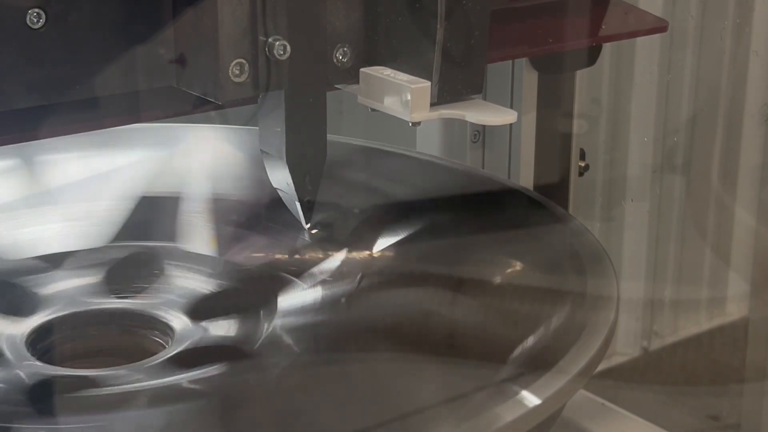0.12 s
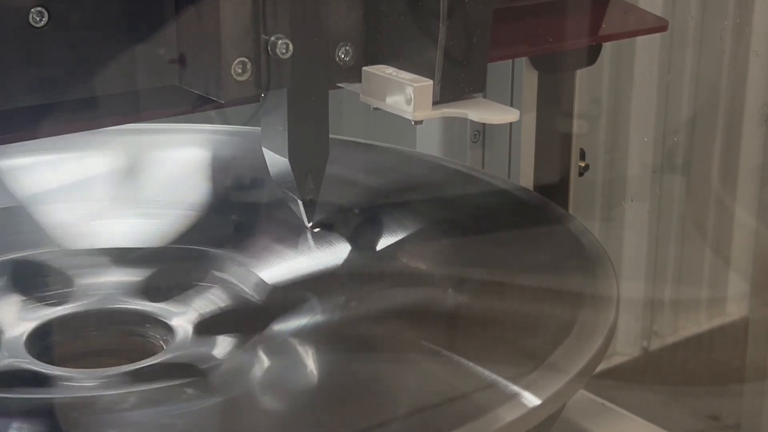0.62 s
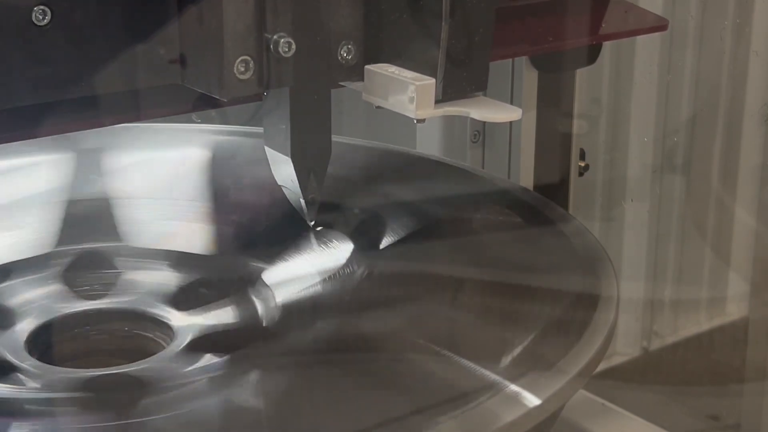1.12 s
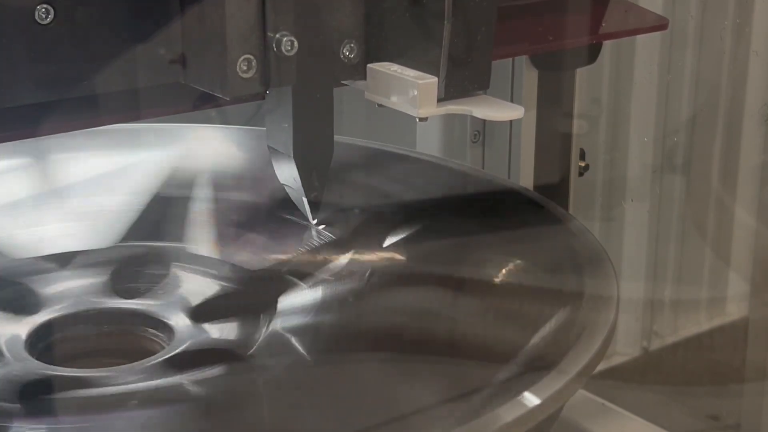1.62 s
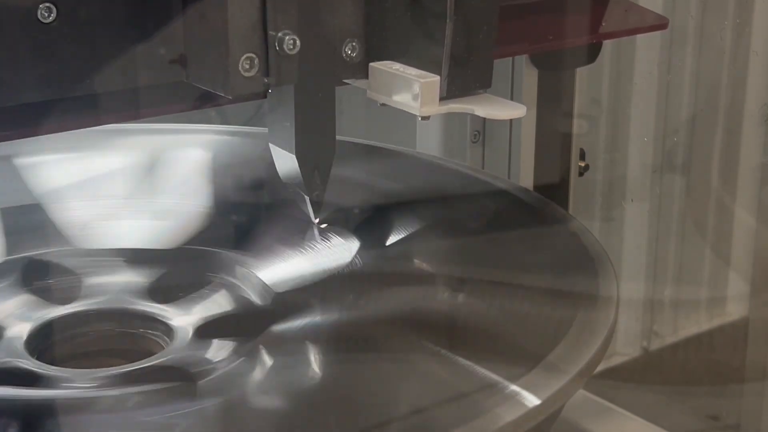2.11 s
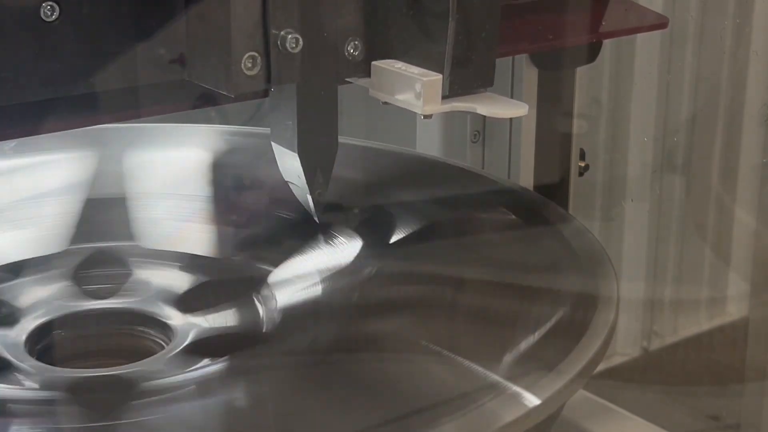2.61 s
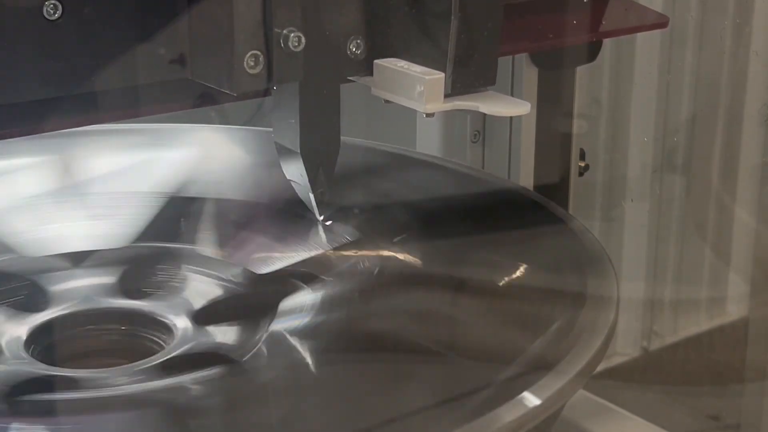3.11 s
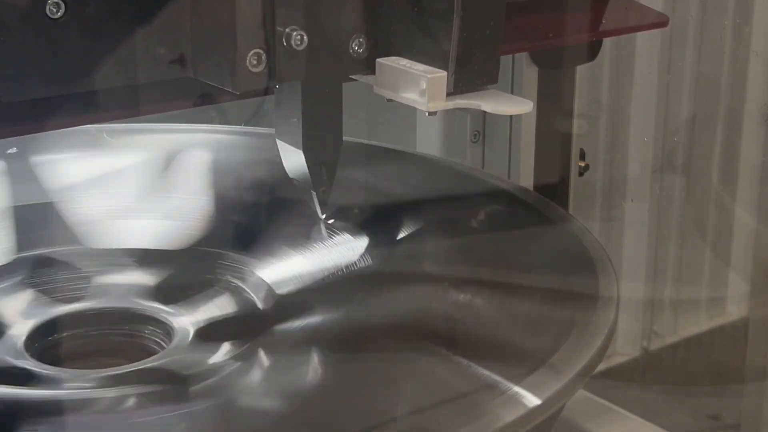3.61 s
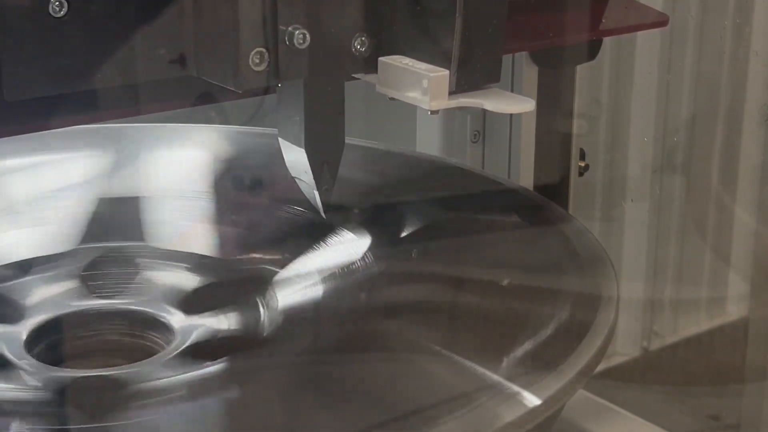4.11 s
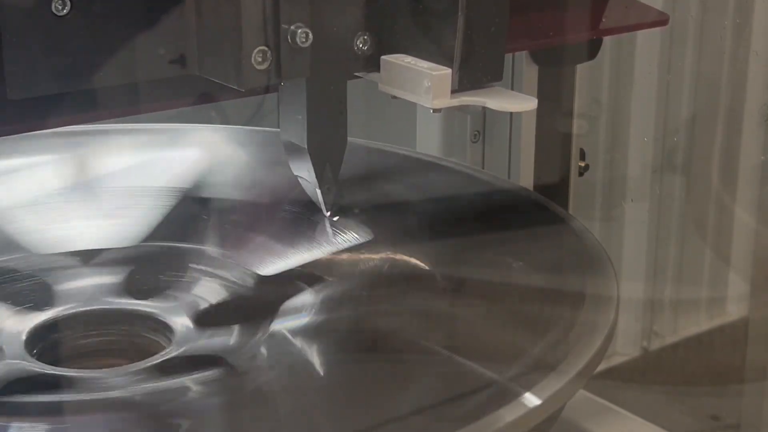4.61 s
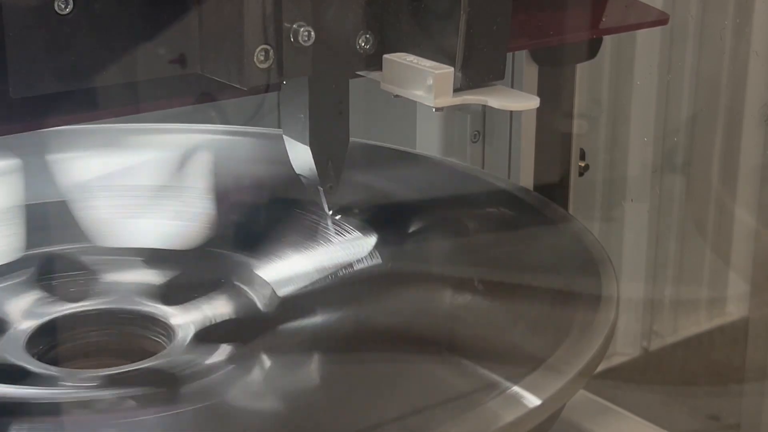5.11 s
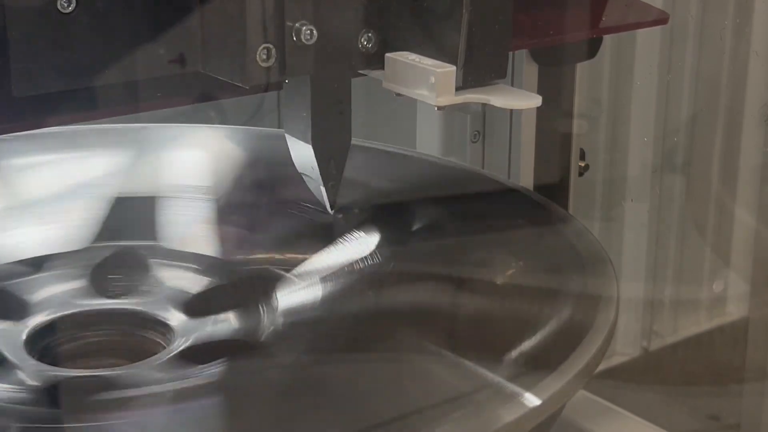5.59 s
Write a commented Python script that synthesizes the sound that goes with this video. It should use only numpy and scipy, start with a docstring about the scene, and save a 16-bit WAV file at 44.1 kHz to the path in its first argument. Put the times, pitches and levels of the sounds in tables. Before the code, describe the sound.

Steady machine noise throughout: deep motor drone, dozens of blurred low thumps each second, a buzzing metallic drivetrain and a thin piercing electric whine. A soft cutting hiss begins dull and becomes steadily brighter, while gear tones beat slowly and strengthen late on. Recorded near the lathe by two closely spaced microphones, dry, with little obvious room echo.

```python
"""A wheel lathe skims a metal face in a workshop, heard from close by through a pair of microphone ports.
From the start the drive train repeats a pattern about ten times a second: six low thumps a turn and a
dense comb of shaft orders that ring the frame. Under it lie the random hiss of cut and fans and the thin
switching whine of the motor drive, summed from sines. As the cut deepens most ranges grow, the treble
most, while a second, barely faster shaft beats slowly against the first, sixfold orders swelling to the end."""
import sys
import numpy as np
from scipy import signal
from scipy.fft import irfft
from scipy.io import wavfile
from scipy.ndimage import uniform_filter1d

SR = 44100
rng = np.random.default_rng(int(sys.argv[2]) if len(sys.argv) > 2 else 0)


def master_out(mix):
    """Clip the mix to full scale and print it as 16-bit PCM to the path in sys.argv[1]."""
    frames = np.transpose(np.atleast_2d(mix))
    ceiling = np.clip(frames, -1, 1)
    pcm = np.round(ceiling * 32767).astype(np.int16)
    wavfile.write(sys.argv[1], SR, pcm)


def boost_factor(decibels):
    """Convert a level in decibels to a linear amplitude factor."""
    exponent = np.asarray(decibels, float) / 20
    return 10 ** exponent


N = 252252

TURN = 4321  # samples a turn of the drive shaft
FIRST_THUMP_S = 0.014


def drive_train():
    """Fourier synthesis of a periodic source: one spectrum of orders a turn, cross-faded end to end."""
    turns, order = N // TURN + 2, np.arange(TURN // 2 + 1)
    hz, t = order * SR / TURN, np.arange(turns) * TURN / SR
    spectrum = shaft_orders(order, hz, t)
    set_thumps(spectrum, hz, t)
    cycle = irfft(spectrum, TURN) * TURN / np.sqrt(2)  # rms of each order to waveform
    fade = np.sin(np.pi / 2 * np.arange(TURN) / TURN) ** 2
    joined = cycle[:, :-1] * (1 - fade) + cycle[:, 1:] * fade
    return joined.reshape(2, -1)[:, :N]


# Strong low orders that make the thumps:
# order, left minus right/dB, level at mean load/dB rms, gain per load/(dB per dB)
THUMP_ORDERS = [(6, 0, -28.5, 0), (12, 3.5, -33.5, 1.5), (18, 3, -36, 0.77), (30, 0.5, -38, 2)]


def set_thumps(spectrum, hz, t):
    """Phase alignment of harmonics: low orders in step add up to one pulse, six times a turn."""
    for order, pan_db, level_db, follows in THUMP_ORDERS:
        order = round(order)
        thump = -np.exp(-2j * np.pi * hz[order] * FIRST_THUMP_S)  # all in step: a downward thump
        level = boost_factor(level_db + follows * load(t))
        spectrum[:, :, order] = ports(hz[order], pan_db)[:, None] * level * thump


# Strongest higher orders of both shafts, before drift and load:
# order, level of first shaft/dB rms, level of second shaft/dB rms, t in step/s
STRONG_ORDERS = [(57, -61, -66, 3), (60, -63, -60, 4.9), (66, -57, -70, .5), (69, -64, -58, 5.8),
                 (72, -55, -55.5, 5.7), (96, -65, -65, 1.9), (114, -60, -62, 5.75), (117, -57, -65, 5.6),
                 (147, -66, -68, 5.5), (174, -61, -60, 4.3), (179, -67, -60, 5.8), (182, -64, -56, 5.5),
                 (183, -67, -57, 5.3), (184, -62, -62, 3.8), (186, -77, -56, 4.2), (188, -68, -63, 5.4),
                 (189, -58, -56, 5.7), (190, -66, -66, 5.9), (192, -80, -60, 3.8), (198, -76, -66, 4),
                 (204, -64, -69, 5), (216, -67, -73, 5.5), (228, -66, -74, 5.4), (234, -59, -65, 6.1),
                 (294, -69, -71, 5), (300, -71, -66, 6.45), (306, -62, -65, 6.3), (309, -69, -70, 4),
                 (318, -68, -72, 5.5), (336, -70, -67, 6.45), (349, -67, -75, 6.2), (379, -64, -75, 6.3),
                 (467, -69, -74, 5), (600, -70, -72, 5.8), (612, -62, -64, 5.8), (618, -64, -64, 5.8)]
# Weight of the part that repeats every turn, before the common gain: f/Hz, level/dB
REPEATING = [(300, -7), (700, -4.5), (1900, -2), (4000, 1), (5500, -7), (9400, -9), (10500, -16),
             (16000, -24)]


def shaft_orders(order, hz, t):
    """Beating of two shafts of nearly equal speed: each order swells when the two are in step."""
    slip_hz_per_order = 0.00184  # lead of the second shaft; order x slip is the beat rate
    count = len(order)
    shape, moved = machine(hz, t, modes_db=-0.24)  # the shaft shakes the frame directly
    size = shape * boost_factor(read(REPEATING, hz) + 8.0)
    size *= boost_factor(2.8 * (order % 3 == 0) + 5.7 * (order % 6 == 0) - 4.0)  # three- and sixfold symmetry
    size *= boost_factor(-4.5 * rng.exponential(1, count) + 3.0)  # uneven teeth: many weak orders

    # weak orders are shared between the shafts by chance
    split, in_step = np.pi / 2 * rng.random(count), 20 * rng.random(count)
    in_step[::6] = 5.8  # s: sixfold orders swell together
    strong, first_db, second_db, strong_s = np.transpose(STRONG_ORDERS)
    strong, first, second = strong.astype(int), boost_factor(first_db), boost_factor(second_db)
    size[strong] = np.hypot(first, second)
    split[strong] = np.arctan2(second, first)
    in_step[strong] = strong_s
    ahead = 2 * np.pi * slip_hz_per_order * order * (t[:, None] - in_step)
    beat = np.cos(split) + np.sin(split) * np.exp(1j * ahead)

    lasting = np.exp(2j * np.pi * rng.random((count, 2)))
    knock = np.exp(-2j * np.pi * hz * FIRST_THUMP_S + 0.9j * rng.standard_normal(count))
    lasting[::6, 0] = knock[::6]  # sixfold orders gather loosely at each thump
    drift = chance(len(t), count, 2)
    drift = uniform_filter1d(drift, size=25, axis=0, mode="wrap") * 5  # back to unit power
    drift[:, strong] *= 0.6  # strong orders hold steadier
    near, other = np.moveaxis(1.015 * lasting * beat[:, :, None] + 0.58 * drift, 2, 0)
    return pair(near, other, hz) * size * moved


def hiss():
    """Filtered noise: random short-time spectra shaped by the same frame, with faint drifting patches."""
    frames, hz = N // 1024 + 5, np.fft.rfftfreq(4096, 1 / SR)
    shape, moved = machine(hz, np.arange(frames) * 1024 / SR, modes_db=-0.64)
    near, other, patches = np.moveaxis(chance(frames, len(hz), 3), 2, 0)
    patches = uniform_filter1d(patches.real, size=4, axis=0)
    patches = uniform_filter1d(patches, size=32, axis=1) * 16  # back to unit power
    spectrum = pair(near, other, hz) * shape * moved * boost_factor(1.27 * patches)
    sound = signal.istft(np.swapaxes(spectrum, 1, 2), nperseg=4096, noverlap=3072)[1][:, :N]
    return sound * np.sqrt(SR / 2048)  # dB per Hz to bin amplitude


# Motor drive whine, before waver and load:
# multiple of the carrier, multiple of the sideband spacing, level/dB rms
WHINE = [(1, -4, -70), (1, -2, -75), (1, -1, -56), (1, 0, -52), (1, 1, -53), (1, 2, -57), (1, 3, -62),
         (2, 0, -50)]
# Other steady tones, before waver and load: f/Hz, level/dB rms
TONES = [(42.1, -47), (46.1, -44), (464.0, -53.5), (927.9, -60)]


def tones():
    """Modulation sidebands of drive switching, and slower motors: sines that waver and follow the load."""
    carrier_hz, sideband_hz = 7854.9, 290.0
    lines = [(round(m) * carrier_hz + round(k) * sideband_hz, db) for m, k, db in WHINE]
    lines += [(hz, db) for hz, db in TONES]
    t, out = np.arange(N) / SR, np.zeros((2, N))
    load_db = load(t)
    for hz, db in lines:
        waver = np.interp(t, np.linspace(0, t[-1], num=40), rng.standard_normal(40))
        level = boost_factor(db + 1.1 * waver + 0.23 * load_db)
        spin = np.exp(2j * np.pi * hz * t + 2j * np.pi * rng.random())
        heard = (ports(hz, read(PAN, hz))[:, None] * spin).real
        out += np.sqrt(2) * level * heard
    return out


# Smooth spectrum between the resonances, before each source's gain: f/Hz, level/dB per Hz
BODY = [(24, -90), (36, -68), (48, -55), (110, -56), (220, -62.5), (380, -63.5), (460, -68), (800, -73),
        (1100, -80.5), (1600, -80.5), (5300, -88.5), (9000, -86), (10500, -90.5), (15000, -95)]
# Frame and wheel resonances, before each source's gain: f/Hz, width/Hz, level/dB per Hz
FRAME = [(50, 10, -51), (113.6, 10, -50), (165, 9.2, -59), (214, 24, -57.5), (333, 70, -61),
         (575.7, 35, -65), (1210, 32, -77), (1875, 214, -75.5), (2130, 154, -75.5), (2406, 210, -80),
         (2720, 470, -91.5), (3122, 190, -77.5), (3456, 77, -76.5), (3790, 390, -79.5), (4674, 320, -78.5),
         (5500, 140, -85), (6070, 290, -82.5), (6950, 350, -79), (7910, 620, -79), (8350, 360, -87),
         (9260, 470, -85.5), (10750, 160, -84), (11500, 300, -91.5), (12900, 600, -93), (15550, 400, -85)]
# Share of the load that each range follows: f/Hz, share/(dB per dB)
FOLLOWS = [(60, 0.23), (250, 0), (620, 0), (735, 0.87), (860, 0.26), (1200, 0.074), (1900, 0.21),
           (2400, 0.75), (3100, 0.31), (3800, 1.1), (5700, 0.8), (6280, 1.6), (6800, 1.1), (12000, 1.05)]


def machine(hz, t, modes_db):
    """Modal resonance: amplitude per root Hz (body plus modes), and its gain as the load moves."""
    modes = sum(boost_factor(db + modes_db) ** 2 / (1 + (2 * (hz - f) / w) ** 4) for f, w, db in FRAME)
    shape = np.sqrt(boost_factor(read(BODY, hz)) ** 2 + modes)
    return shape, boost_factor(read(FOLLOWS, hz) * load(t)[:, None])


# Cutting load, heard as the level of the treble hiss; load() takes off the mean: t/s, level/dB
LOAD = [(0, -60), (.7, -58), (1.6, -56.5), (2.7, -55.5), (4.2, -54.5), (5.72, -53.8)]


def load(t):
    """Source strength under load: the cutting load in dB about its mean."""
    s, level_db = np.transpose(LOAD)
    load_db = np.interp(t, s, level_db)
    return load_db - load_db.mean()


# Likeness of the two ports: f/Hz, likeness (0 to 1)
SAME = [(60, 0.95), (290, 0.87), (640, 0.47), (1200, 0.68), (2000, 0.95), (2400, 1), (3200, 0.89),
        (5000, 0.99), (15000, 1)]


def pair(near, other, hz):
    """Interaural-style coherence: two partly alike versions of one spectrum, as the ports hear them."""
    same = np.clip(read(SAME, hz), 0, 1)
    mid, side = np.sqrt((1 + same) / 2) * near, np.sqrt((1 - same) / 2) * other
    return np.array([mid + side, mid - side]) * ports(hz, read(PAN, hz))[:, None]


# Level difference of the ports: f/Hz, left minus right/dB
PAN = [(50, 2), (130, 0.54), (450, 1.9), (700, 1.9), (1100, 0.47), (3000, -0.57), (5000, 0)]
# Phase difference of the ports: f/Hz, left lead/rad
LEAD = [(200, .1), (600, 0), (1300, -.5), (2300, 0), (3300, .7), (4600, .4), (5400, 0), (7200, .1),
        (8000, .45), (8550, 0), (10200, -3.14), (12050, -6.28), (13850, -9.42), (15650, -12.57)]


def ports(hz, pan_db):
    """Level and phase difference between receivers, split evenly over the left and the right port."""
    half = boost_factor(pan_db / 2) * np.exp(0.5j * read(LEAD, hz))
    return np.array([half, 1 / half])


def read(points, hz):
    """Logarithmic frequency scale: reads a (f/Hz, value) table by straight lines over log frequency."""
    f, value = np.transpose(points)
    return np.interp(np.log(hz + 1), np.log(f + 1), value)


def chance(*shape):
    """Gaussian noise spectrum: complex random amplitudes of unit mean power."""
    a, b = rng.standard_normal((*shape, 2)).T
    return (a + 1j * b).T / np.sqrt(2)


def scene():
    """Superposition of the drive train, the hiss and the steady tones."""
    return drive_train() + hiss() + tones()


def low_pass(x):
    """Removes everything above the highest recorded frequency."""
    return signal.sosfilt(signal.butter(12, 17160, fs=SR, output="sos"), x)


def record(dry):
    """Band limiting: the microphones cut the deepest bass, the recorder the top."""
    low_edge_hz, high_edge_hz = 31, 15860
    bass_cut = signal.butter(N=2, Wn=low_edge_hz, btype="high", fs=SR, output="sos")
    top_cut = signal.firwin(numtaps=1023, cutoff=high_edge_hz, window=("kaiser", 10), fs=SR)
    mix = signal.oaconvolve(signal.sosfiltfilt(bass_cut, dry), top_cut[None], "same")
    return low_pass(mix)


dry = scene()
out = record(dry)
master_out(out)
```